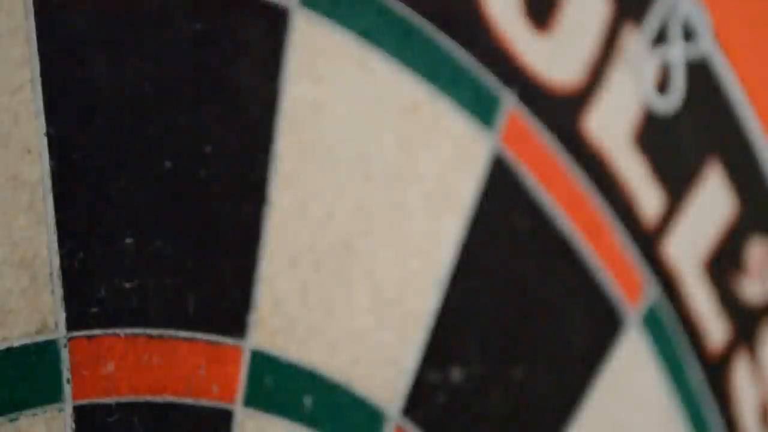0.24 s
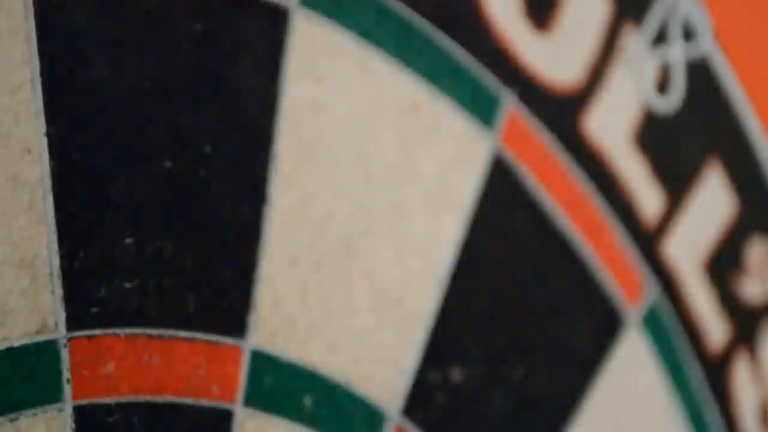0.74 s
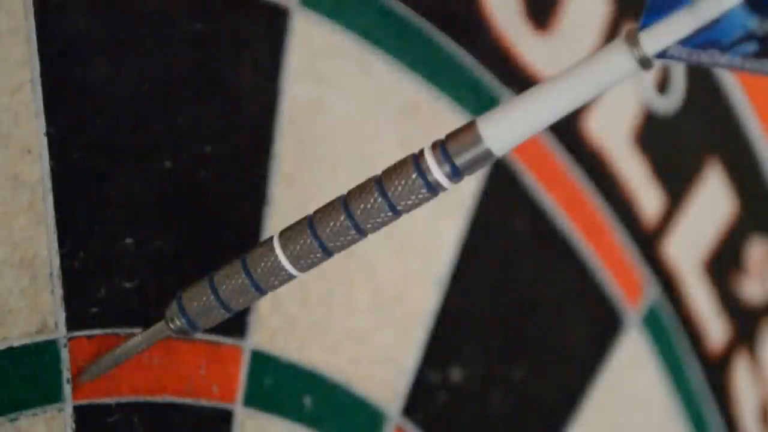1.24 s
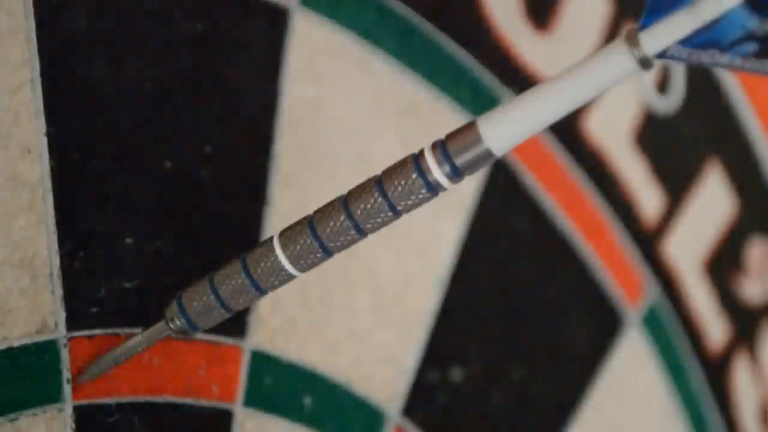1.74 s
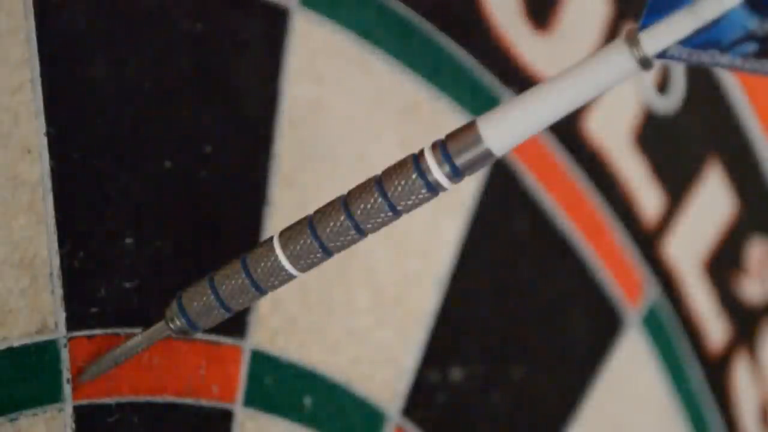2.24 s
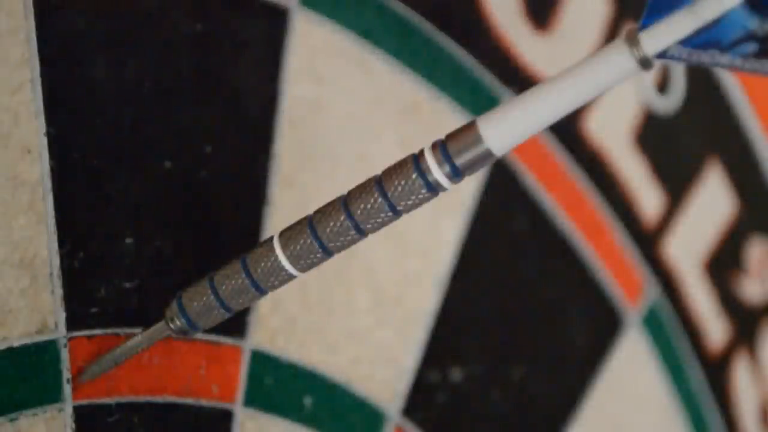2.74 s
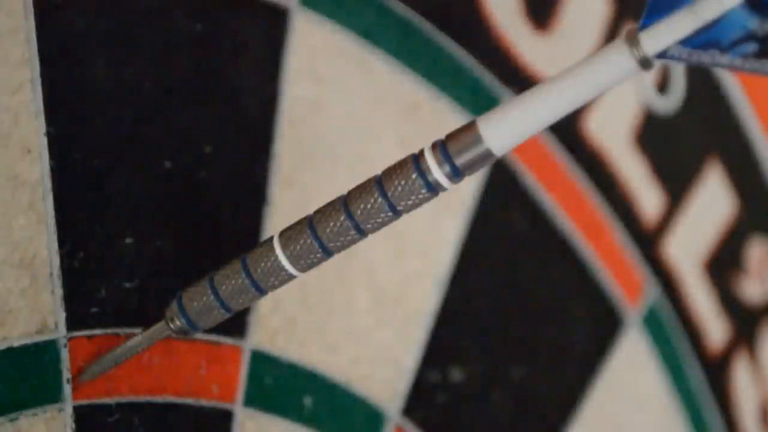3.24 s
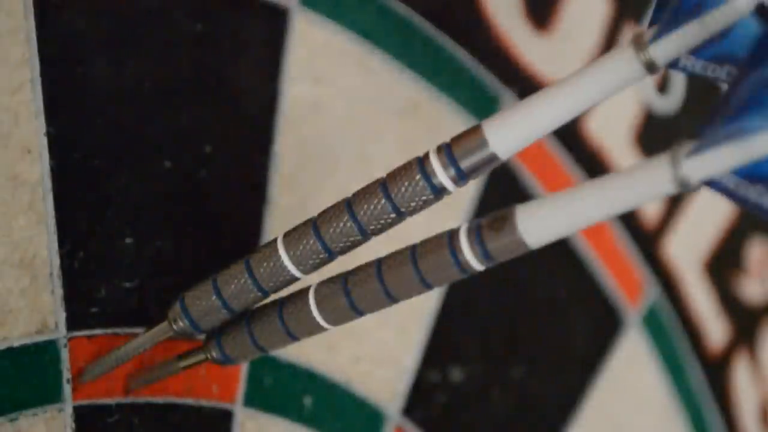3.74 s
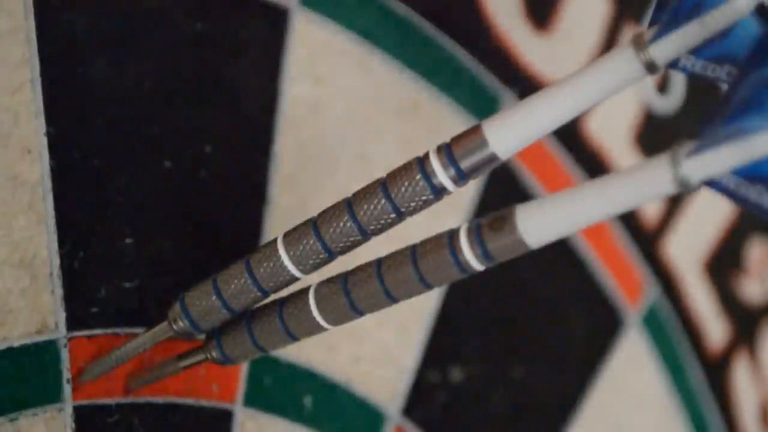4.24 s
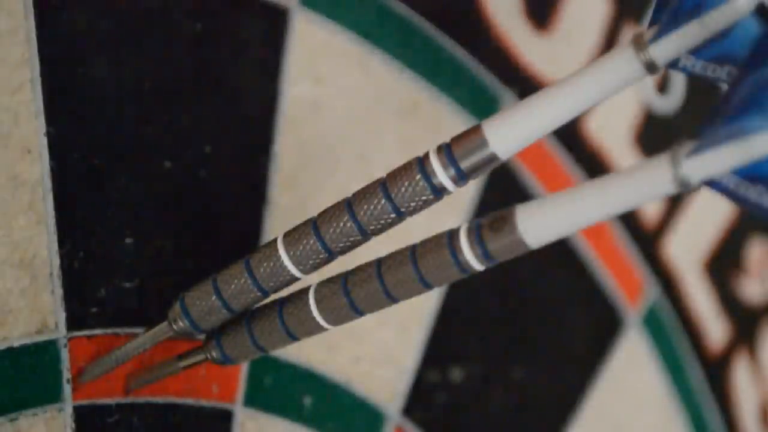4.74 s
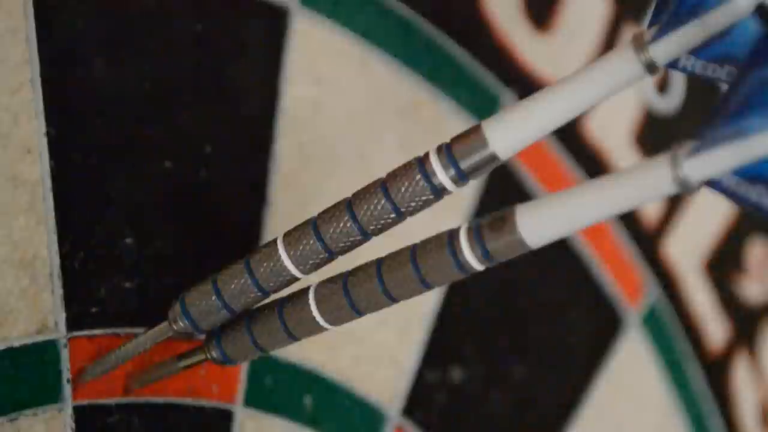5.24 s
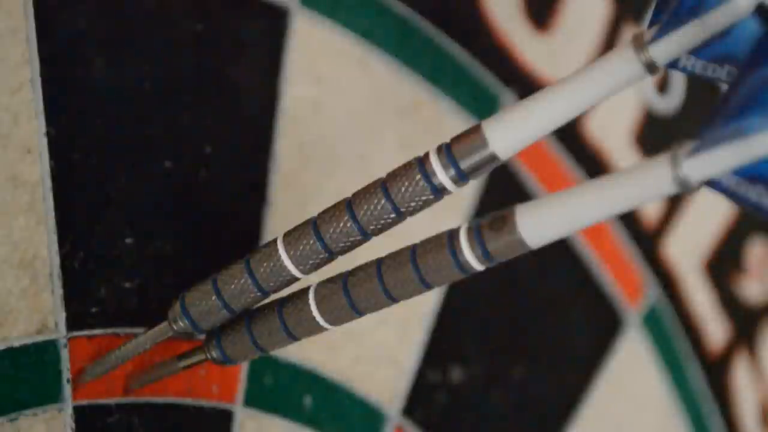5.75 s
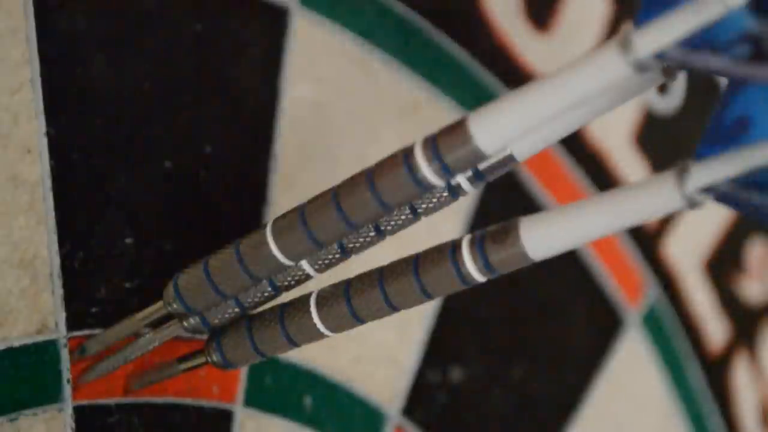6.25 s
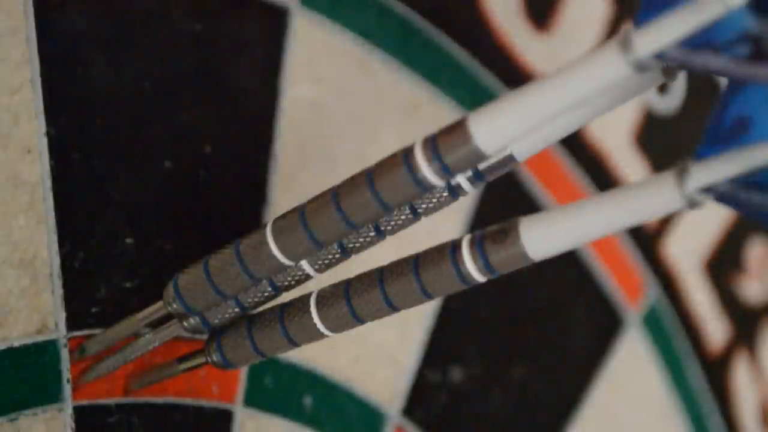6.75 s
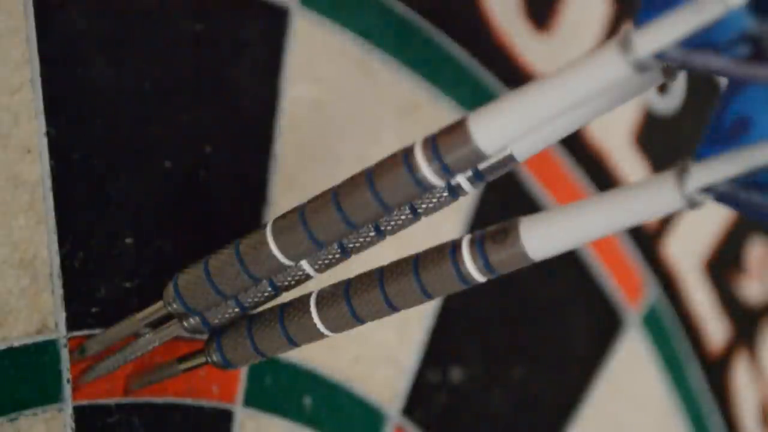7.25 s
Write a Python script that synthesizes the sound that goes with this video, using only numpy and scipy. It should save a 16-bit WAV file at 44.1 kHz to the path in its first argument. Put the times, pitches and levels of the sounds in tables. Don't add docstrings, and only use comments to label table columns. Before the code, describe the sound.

Very close, hard dart thuds into a fibre board, first clean, then two with bright metal scrapes and quivering ticks, over faint hiss.

```python
import sys
import numpy as np
from scipy import signal
from scipy.fft import rfft, irfft
from scipy.io import wavfile
from scipy.ndimage import uniform_filter1d

SR = 44100
rng = np.random.default_rng(int(sys.argv[2]) if len(sys.argv) > 2 else 0)


def dump(signal):
    limited = np.clip(np.atleast_2d(signal).T, -1, 1)
    pcm = np.round(limited * 32767).astype(np.int16)
    wavfile.write(sys.argv[1], SR, pcm)


def amplitude_ratio(level_db):
    exponent = np.asarray(level_db, float) / 20
    return 10 ** exponent


N = 330377

# (frequency [Hz], t60 [s])
SHAFT_MODES = [(4430, 0.003), (4700, 0.009), (6750, .008)]
STEM_MODES = [(1740, 0.02), (1870, 0.018)]
# (frequency [Hz], density [dB per Hz])
RASP_SPECTRUM = [(180, -49.5), (300, -15.5), (1150, -17), (1810, -12), (3640, -14), (4520, -10.5),
                 (5080, -8), (7080, -11.5), (9090, -3.5), (16000, -34.5)]


def evened(x):
    return x / np.sqrt(np.mean(x ** 2) + 1e-20)


def read(points, hz):
    f, value = np.transpose(points)
    return np.interp(np.log(hz + 1), np.log(f + 1), value)


def add(mix, start_s, sound):
    part = mix[round(start_s * SR):][:len(sound)]
    part += sound[:len(part)]


def coloured(points, size=N):
    spectrum = rfft(rng.standard_normal(size))
    gain = amplitude_ratio(read(points, np.fft.rfftfreq(size, 1 / SR)))
    return evened(irfft(spectrum * gain, size))


def ring(hz, t60):
    t = np.arange(SR) / SR
    return amplitude_ratio(-60 * t / t60) * np.sin(2 * np.pi * hz * t)


def swells(rest_db, rows):
    t = np.arange(N) / SR
    rises = sum(amplitude_ratio(2 * db) * np.exp(-2 * ((t - s) / half_s) ** 2) for s, half_s, db in rows)
    return np.sqrt(amplitude_ratio(2 * rest_db) + rises)


def thud(start_s, entry_db, stop_db, local_hz, local_db):
    # (frequency [Hz], level [dB], t60 [s])
    disc_modes = [(393, 0, .055), (530, -8, .018), (670, -16, .07), (736, -11, .04), (870, -17, .05)]
    # (frequency [Hz], level [dB], t60 [s])
    frame_modes = [(205, -23.5, .09), (234.5, -32, 0.15), (274, -11, 0.0027), (930, -21, .025),
                   (1200, -24.5, 0.02), (1430, -19, 0.043), (1830, -18.5, .02), (2370, -14, 0.0082),
                   (2750, -16, 0.0088)]
    stop_s, rebound_s = 0.00214, 0.00375
    rebound_db = -4
    t = np.arange(400) / SR

    def jolt(at_s, wide_s):
        return np.sin(np.pi * np.clip((t - at_s) / wide_s, 0, 1)) ** 2 / (wide_s * SR / 2)

    recoil = jolt(stop_s, 0.0006) + amplitude_ratio(rebound_db) * jolt(rebound_s, 0.0007)
    force = amplitude_ratio(entry_db) * jolt(0, 0.0008) - amplitude_ratio(stop_db) * recoil
    modes = sum(amplitude_ratio(db) * ring(hz, t60) for hz, db, t60 in disc_modes + frame_modes)
    modes = modes + amplitude_ratio(local_db) * ring(local_hz, 0.046)
    modes = signal.lfilter(*signal.butter(3, 160, "high", fs=SR), modes)
    blow = signal.fftconvolve(force, modes)[:SR]
    return start_s, blow + boom(stop_db + 8) + settle(stop_db, 0.52 * entry_db)


def settle(stop_db, push_db):
    t = np.arange(SR) / SR
    band = signal.butter(2, [1450, 2100], "band", fs=SR, output="sos")
    buzz = evened(signal.sosfilt(band, rng.standard_normal(len(t))))
    buzz = amplitude_ratio(-36 - 60 * t / 0.3) * (1 - np.exp(-t / 0.0032)) * buzz
    panel = ring(212, 0.5) + ring(237, 0.5) + 0.8 * ring(390, 0.4) + 0.4 * ring(680, 0.4)
    panel = amplitude_ratio(-29) * panel * (1 - np.exp(-(t / 0.06) ** 2))
    push = amplitude_ratio(push_db - 23) * np.sin(2 * np.pi * np.clip(t / 0.009, 0, 1))
    return amplitude_ratio(stop_db) * (buzz + panel) - push


def boom(level_db, t60_share=1):
    # (frequency [Hz], level [dB], t60 [s])
    air_modes = [(46.9, -43, .8), (58, -45.5, 0.64), (90, -36.5, .45), (111.4, -42, .3)]
    swell = 1 - np.exp(-np.arange(SR) / SR / 0.06)
    return amplitude_ratio(level_db) * swell * sum(amplitude_ratio(db) * ring(hz, t60 * t60_share) for hz, db, t60 in air_modes)


def slide(start_s, length_s, first_db, last_db, rattle_db):
    let_go_s, fade_db_per_s = 0.0032, 219.5
    t = np.arange(12000) / SR
    lumps = evened(uniform_filter1d(rng.standard_normal(len(t)), size=40))
    grip = amplitude_ratio(3 * lumps) * (1 - np.exp(-t / 0.0005))
    stop_s = length_s + let_go_s
    level_db = np.interp(t, [0, length_s, stop_s], [first_db, last_db, rattle_db])
    level_db = level_db - fade_db_per_s * np.maximum(t - stop_s, 0)
    return start_s, chatter(amplitude_ratio(level_db) * grip * coloured(RASP_SPECTRUM, size=len(t)))


def chatter(x):
    modes = sum(ring(hz, 1.5 * t60)[:2000] for hz, t60 in SHAFT_MODES[:2] + STEM_MODES[1:])
    modes = modes + amplitude_ratio(2) * (ring(620, 0.025) + ring(880, 0.025))[:2000]
    return x + amplitude_ratio(-5) * signal.fftconvolve(x, modes / np.linalg.norm(modes))[:len(x)]


def contact(start_s, level_db, length_ms, barrel_hz, knock_db):
    t = np.arange(2000) / SR
    rub = np.sin(np.pi * np.clip(t / (length_ms / 1000), 0, 1)) ** 0.67
    after = signal.lfilter([0.06], [1, -0.95], rub)
    barrel = after * np.sin(2 * np.pi * (barrel_hz * t + rng.random()))
    rasp = amplitude_ratio(-4.5) * after * coloured(RASP_SPECTRUM, size=2000)
    stem_db = 1.4 * knock_db - 5.5
    shaft = amplitude_ratio(knock_db - 3.5) * sum(ring(*mode)[:2000] for mode in SHAFT_MODES)
    stem = amplitude_ratio(stem_db - 3.5) * sum(ring(*mode)[:2000] for mode in STEM_MODES)
    rise = 1 - np.exp(-t / 0.00028)
    return start_s, amplitude_ratio(level_db) * (barrel + rasp + rise * (shaft + stem))


def tap(start_s, level_db):
    barrel_hz = 9200 + 570 * rng.standard_normal()
    return contact(start_s, level_db, length_ms=1.1, barrel_hz=barrel_hz, knock_db=-6)


def room(x):
    # (frequency [Hz], t60 [s])
    decay = [(100, 0.07), (250, .4), (700, 0.35), (1900, 0.35), (5000, .23), (12800, 0.1)]
    # (frequency [Hz], level [dB])
    tone = [(100, -2), (150, -8), (230, 7), (330, -9), (420, -6.5), (570, 4), (720, -2.5), (880, 6),
            (1300, -1), (1800, -6), (3000, -2.5), (5000, -0.5), (9000, -4.5), (15000, -4)]
    # (delay [ms], level [dB])
    echoes = [(20, -24), (27.5, -28.5), (41, -25)]
    taps = np.zeros(SR)
    at = np.arange(200, SR - 20, 20)
    taps[at + rng.integers(0, 20, len(at))] = rng.choice([-1., 1.], len(at))
    hz, t, z = signal.stft(taps, SR, nperseg=512)
    z = z * amplitude_ratio(read(tone, hz)[:, None] - 60 * t / read(decay, hz)[:, None])
    tail = signal.istft(z, SR, nperseg=512)[1]
    tail = tail * (1 - np.exp(-(np.arange(len(tail)) / SR / 0.015) ** 2))
    tail = amplitude_ratio(-18) * tail / np.linalg.norm(tail)
    for delay_ms, db in echoes:
        add(tail, delay_ms / 1000, amplitude_ratio(db) * np.hanning(9) / 4)
    return signal.fftconvolve(x, tail)[:N]


def traffic():
    # (frequency [Hz], width [Hz], level [dB])
    resonances = [(110, 50, -4.5), (199, 55, 0), (255, 60, 3), (350, 120, -8.5)]
    # (loudest time [s], half length [s], level [dB])
    passes = [
        (0.996, 0.15, -70),
        (2.55, 0.48, -71.5),
        (3.56, 0.1, -69.5),
        (5.226, 0.22, -65.5),
        (5.831, 0.23, -58),
        (6.15, 0.11, -63.5),
        (7.096, .2, -60),
    ]
    hz = np.geomspace(30, 2000, 200)
    shape = sum(amplitude_ratio(db) / (1 + ((hz - f) / (wide_hz / 2)) ** 2) for f, wide_hz, db in resonances)
    rumble = coloured(np.transpose([hz, 20 * np.log10(shape)]))
    return amplitude_ratio(-3) * rumble * swells(-80.5, passes)


def sleeve():
    # (frequency [Hz], density [dB per Hz])
    cloth = [(300, -2.5), (1000, 4), (3000, -1), (6000, -9), (10000, -5), (14000, -11)]
    # (loudest time [s], half length [s], level [dB])
    swings = [
        (1.016, 0.077, -68),
        (1.8, 0.045, -70),
        (3.57, .1, -68),
        (6.151, .1, -65.5),
        (6.902, 0.21, -68),
        (7.334, 0.22, -65),
        (7.49, .05, -62.5),
    ]
    return coloured(cloth) * swells(-77.5, swings)


def mains_hum():
    # (frequency [Hz], level [dB])
    tones = [(59.2, -76), (118.4, -78)]
    t = np.arange(N) / SR
    return sum(amplitude_ratio(db + 1.5) * np.sin(2 * np.pi * hz * t) for hz, db in tones)


def amplifier_hiss():
    # (frequency [Hz], density [dB per Hz])
    spectrum = [(20, -23), (40, -5), (58, -2), (73, -5), (88, -12), (117, -1), (150, -11.5), (244, -2.5),
                (300, -8), (690, -8), (3000, -14), (15800, -21.5), (16600, -22.5)]
    return amplitude_ratio(-63) * coloured(spectrum)


def scene():
    # (tip entry time [s], entry level [dB], stop level [dB], local mode [Hz], its level [dB])
    landings = [
        (1.2736, -14, -8, 780, -9),
        (3.8360, -24, -9, 890, -9),
        (6.3928, -26, -10.5, 860, -12),
    ]
    # (start [s], length [s], first level [dB], last level [dB], rattle level [dB])
    slides = [
        (1.2736, 0.0036, -29, -35, -58),
        (3.8240, .016, -21.5, -13.5, -31.5),
        (6.3816, .0155, -27.5, -19, -27),
    ]
    # (time [s], level [dB], length [ms], barrel ring [Hz], knock level [dB])
    scrapes = [(1.2727, -29.5, 0.91, 9640, -6), (1.275, -31.5, 1.7, 8900, -1),
               (1.2780, -36.5, 2.47, 9940, 9.5), (3.8242, -1.5, 1.9, 9540, -13.5),
               (3.8259, -8.5, 2.2, 8770, -9.5), (3.8285, -14, 1.5, 8700, -11),
               (3.8318, -11.5, 1.5, 7200, 5.5), (3.8358, -5, 1.6, 10900, -7),
               (3.8397, -17, 1.2, 9400, -6.5), (3.8423, -17.5, 2.0, 8890, -6.5),
               (6.3807, -9, 0.9, 11400, -16), (6.3818, 2, 1.55, 9200, -17), (6.3842, 0.5, 3.3, 8890, -15.5),
               (6.387, -11, 2.3, 9800, -7.5), (6.3914, -1, 1.6, 8980, -12.5), (6.3934, -6, 1.5, 10160, -8),
               (6.397, -18, 2.0, 10500, -2)]
    # (time [s], level [dB])
    touches = [(3.845, -23.5), (3.8626, -27.5), (3.8718, -24.5), (6.398, -21), (6.4073, -21.5),
               (6.4096, -19), (6.4154, -20.5), (6.4185, -26.5), (6.4205, -21), (6.425, -20),
               (6.4324, -25.5)]
    # (time [s], level [dB])
    footfalls = [
        (2.322, -13),
        (5.2, -22),
        (5.622, -26),
        (6.098, -25.5),
    ]
    darts = np.zeros(N)
    for source, table in ((thud, landings), (slide, slides), (contact, scrapes), (tap, touches)):
        for row in table:
            add(darts, *source(*row))
    for start_s, level_db in footfalls:
        add(darts, start_s, boom(level_db, t60_share=0.37))
    background = traffic() + sleeve() + mains_hum() + amplifier_hiss()
    return (darts + room(darts) + background)[None]


def low_pass(x):
    return signal.sosfilt(signal.butter(12, 16870, fs=SR, output="sos"), x)


def record(dry):
    full_scale = 0.5
    clipped = np.clip(signal.resample_poly(dry, 160, 147, axis=1), -full_scale, full_scale)
    clipped = signal.resample_poly(clipped, 147, 160, axis=1)[:, :N]
    clipped = signal.lfilter(*signal.butter(1, 25, "high", fs=SR), clipped)
    lowpass = signal.firwin(191, 16200, window=("kaiser", 8), fs=SR)
    return low_pass(signal.oaconvolve(clipped, lowpass[None], "same"))


dry = scene()
out = record(dry)
dump(out)
```